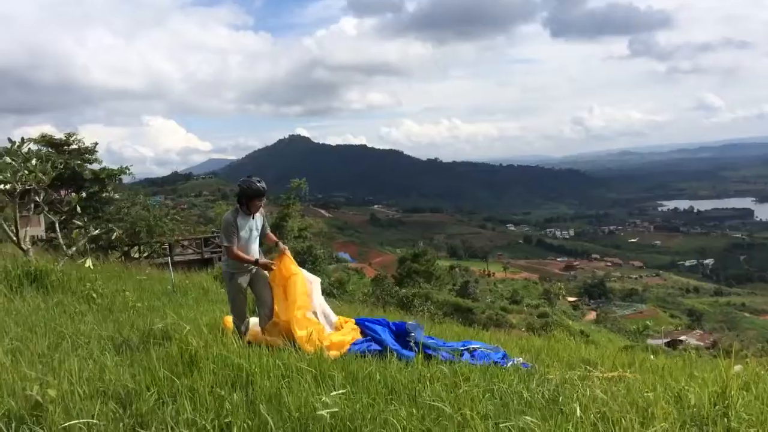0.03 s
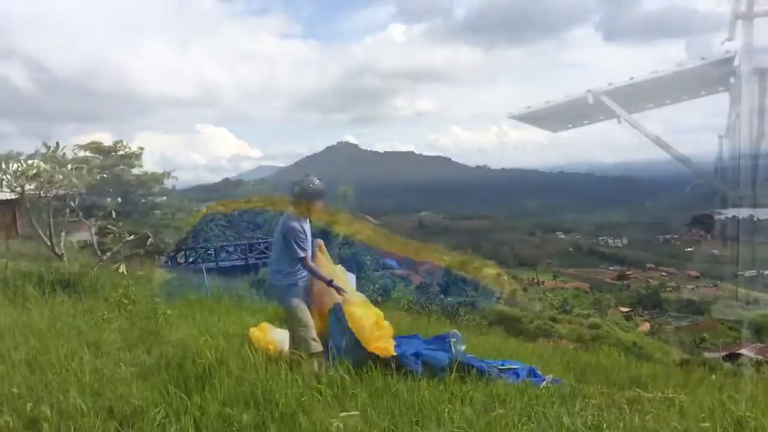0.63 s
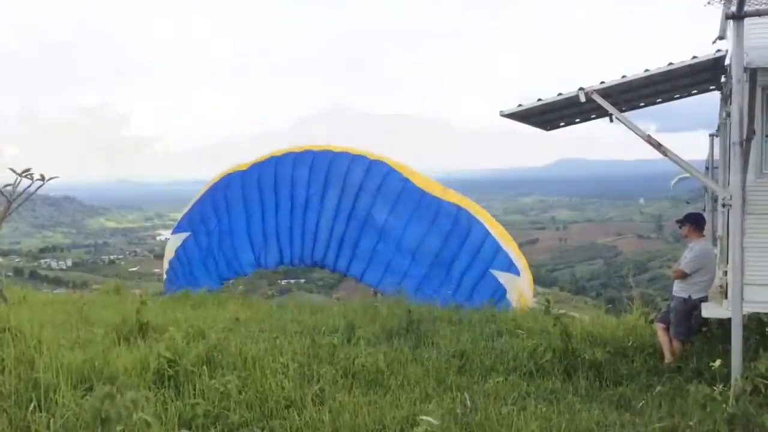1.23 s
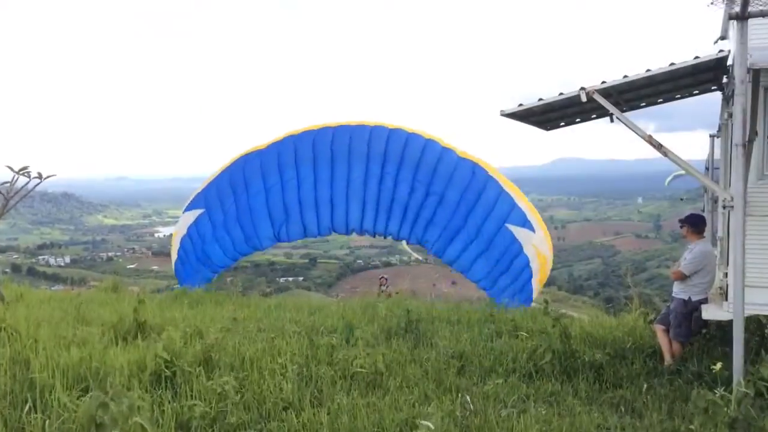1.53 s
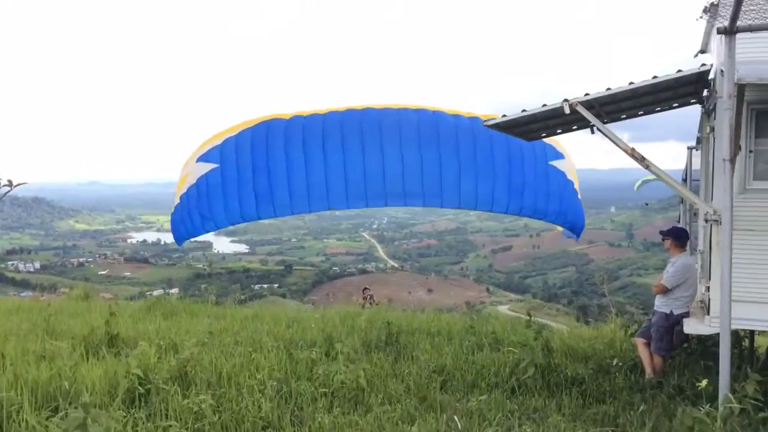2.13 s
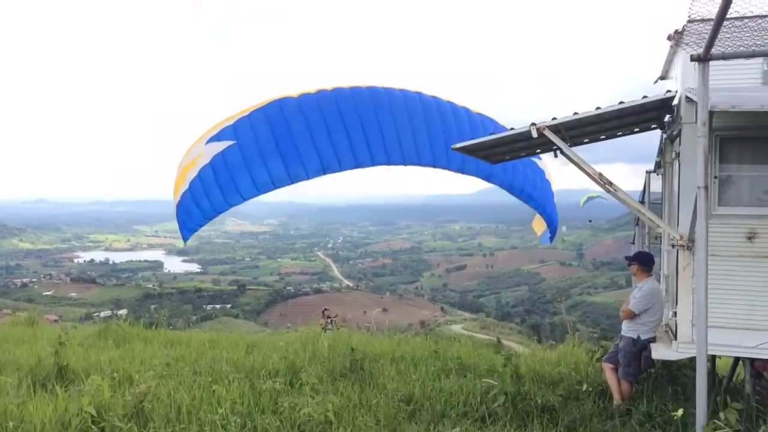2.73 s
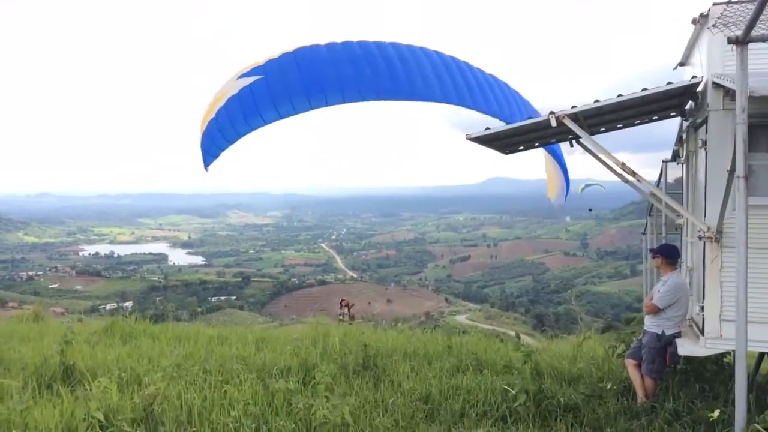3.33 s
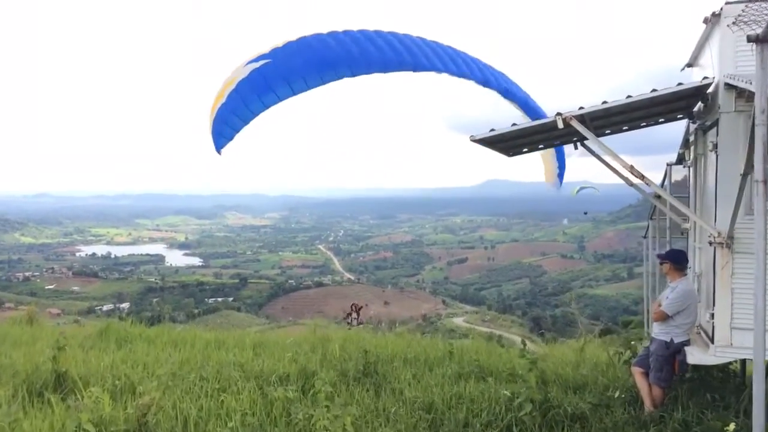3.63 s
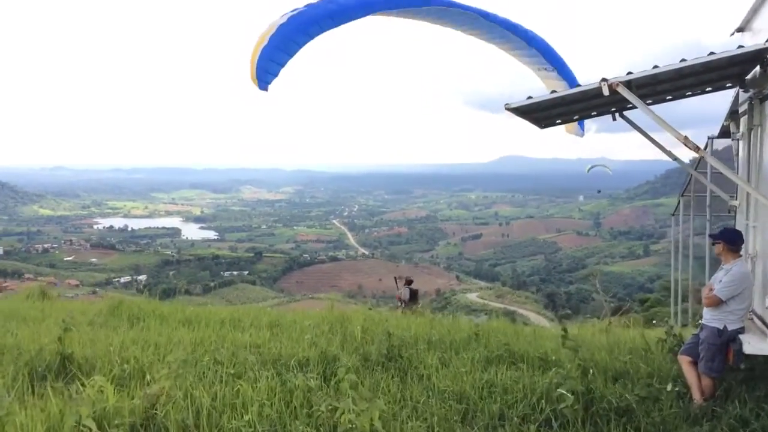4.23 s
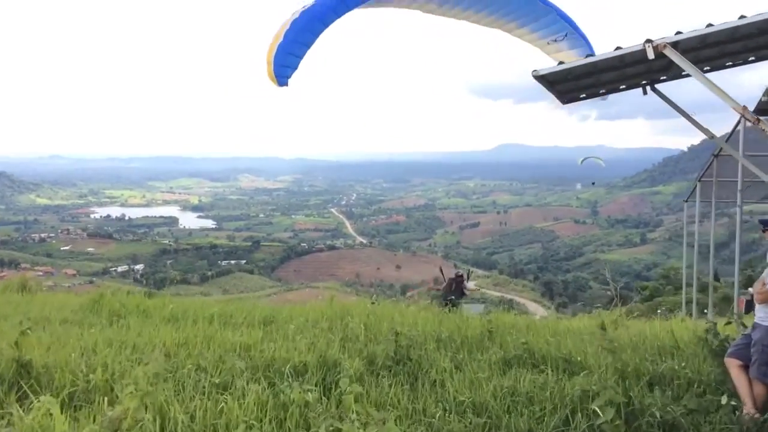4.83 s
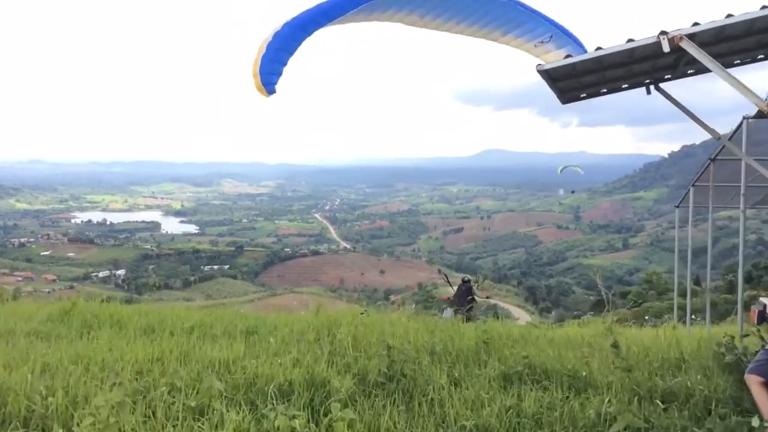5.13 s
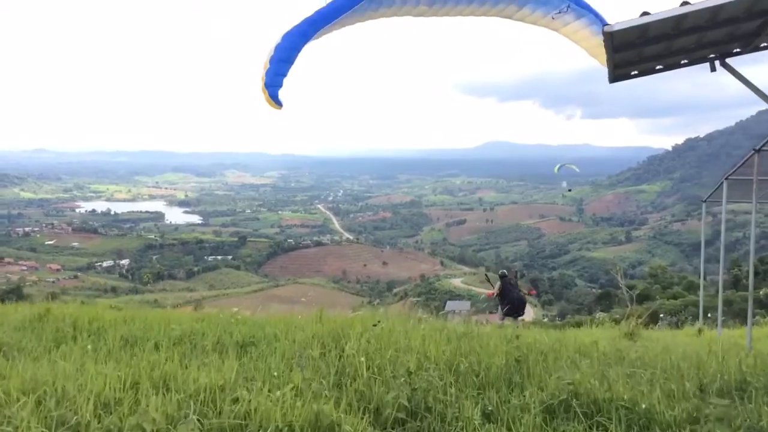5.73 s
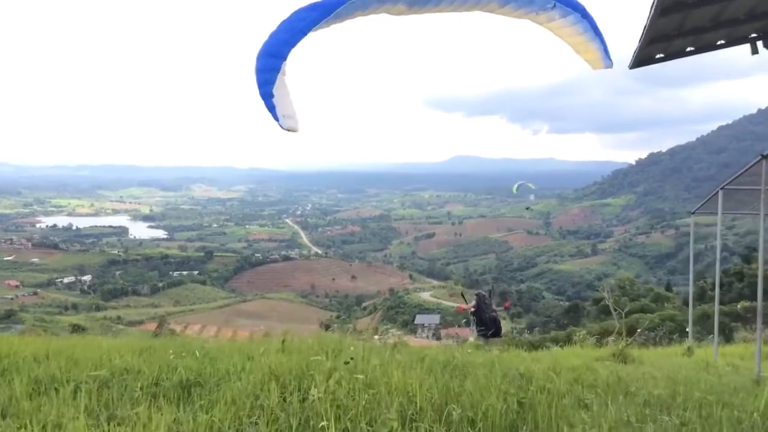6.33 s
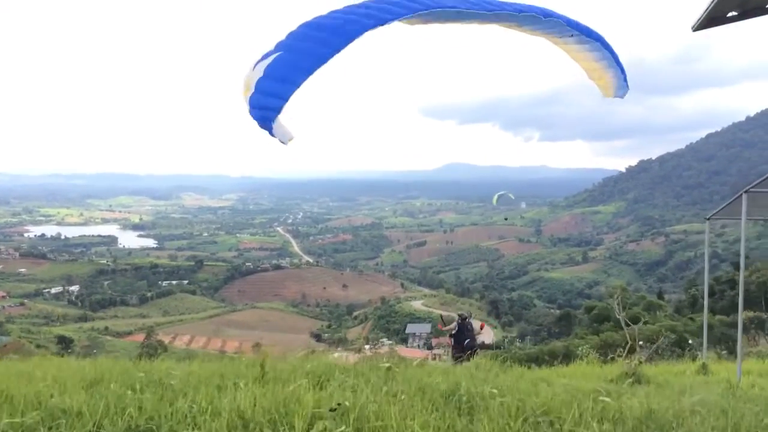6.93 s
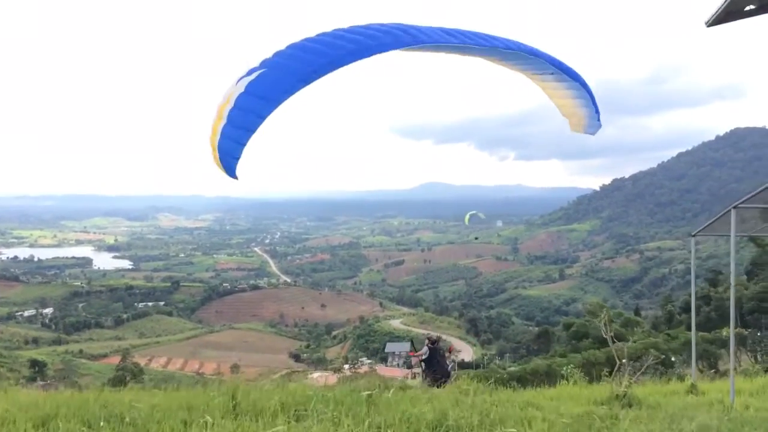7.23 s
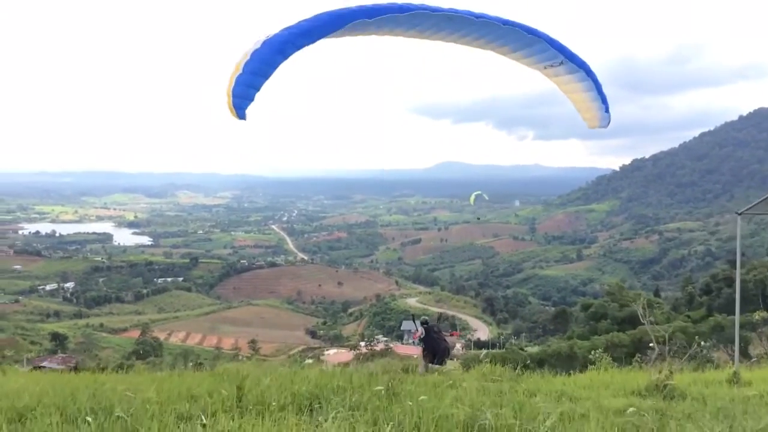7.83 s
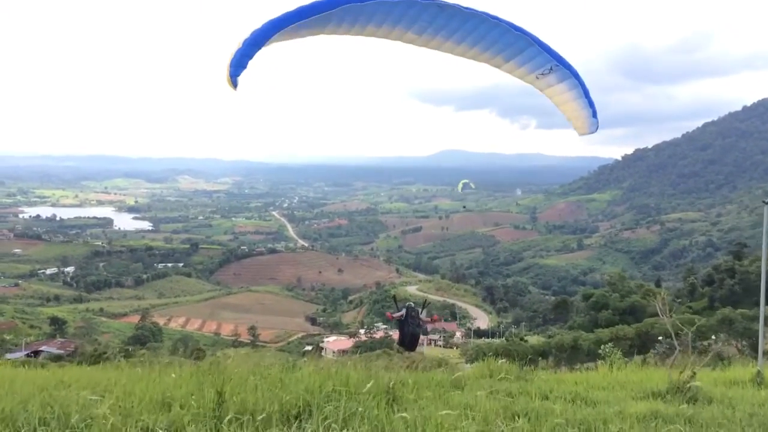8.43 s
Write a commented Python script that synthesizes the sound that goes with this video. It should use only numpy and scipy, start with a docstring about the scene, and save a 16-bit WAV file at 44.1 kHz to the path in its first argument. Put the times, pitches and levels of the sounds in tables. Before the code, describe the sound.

Wind on the microphone is the loudest sound, a low, uneven rumble with flutters and thumps, on an open hilltop without echo. For the first 2 seconds, a paraglider's thin cloth billows, crinkles and flaps softly underneath; its rustle fades out by about 4.5 seconds. From 2 to 3.8 seconds the buffeting grows dense, with the hardest thump near 2.5 seconds and a brief low flutter near 3. Around 4 to 5 seconds the wind on the microphone drops away, leaving grass hissing in waves, a soft roar of air over the slope and a few faint flaps. The rumble returns just after 5 seconds and builds to a strong, thumping gust around 6.6, joined by a faint hollow rush. A short rasp tears across the microphone at 7.2 seconds. Buffeting and grass hiss continue until the end, at about 8.5 seconds.

```python
"""A grassy hilltop in gusty wind, where a paraglider is being launched.
Air roars over the slope, and grass hisses in waves as its blades brush together.
The wing's cloth rushes and flaps as it fills, and its rush fades as it flies off.
Loudest is the wind on the microphone: swirls of air (eddies) rumble, flutter and thump,
and one gust rasps straight across the microphone's opening."""
import sys
import numpy as np
from scipy import signal
from scipy.fft import rfft, irfft
from scipy.io import wavfile
from scipy.ndimage import uniform_filter1d

SR = 44100
rng = np.random.default_rng(int(sys.argv[2]) if len(sys.argv) > 2 else 0)


def dump_mix(stems):
    """Bounce the given channels to the path in sys.argv[1] as a 16-bit WAV at rate SR."""
    frames = np.atleast_2d(stems).T  # one column per channel
    limited = np.clip(frames, -1, 1)  # hard clip at full scale
    pcm = np.round(limited * 32767).astype(np.int16)
    wavfile.write(sys.argv[1], SR, pcm)


N = 373968
TIME, HZ = np.arange(N) / SR, np.fft.rfftfreq(N, 1 / SR)

# waves of wind that sweep through the grass: peak_s, level_db, half_length_s
GRASS_WAVES = [(0, -46, 0.12), (.32, -49.5, 0.11), (.8, -49.5, 0.16), (1.38, -58, 0.13),
               (2.85, -59.5, 0.046), (3.08, -62.5, 0.054), (3.23, -53, 0.057), (3.57, -60.5, 0.047),
               (3.9, -50, 0.064), (4.03, -51.5, 0.069), (4.17, -50, 0.024), (4.31, -56.5, 0.05),
               (4.56, -50, 0.072), (4.76, -52, 0.063), (5.12, -47.5, 0.061), (5.38, -53, .028),
               (5.56, -51, 0.069), (5.75, -55.5, 0.058), (6.06, -45.5, 0.046), (6.23, -52, 0.073),
               (6.33, -50, 0.02), (6.44, -45.5, 0.056), (6.59, -47, 0.045), (6.85, -47.5, 0.091),
               (7.02, -49.5, 0.041), (7.27, -49, 0.11), (7.45, -49.5, 0.033), (7.61, -46, 0.031),
               (7.79, -46.5, 0.071), (8.125, -46.5, 0.026), (8.25, -44.5, 0.044), (8.42, -56, 0.038)]
# wind strength at the microphone, two long gusts around a lull: time_s, level_db
WIND_STRENGTH = [(0, -39), (.33, -38), (.55, -43.5), (.9, -38), (1.6, -40), (2.3, -38), (2.6, -37),
                 (3.3, -37.5), (3.9, -38.5), (4.36, -56.5), (4.7, -54), (5.07, -57.5), (5.15, -44),
                 (5.95, -44.5), (6.62, -31.5), (7.1, -38), (7.45, -34.5), (8.48, -34.5)]
# eddies that hit the microphone: time_s, level_db, low_hz (lower if big), top_hz (higher if sharp)
EDDIES = [(0.087, -33.5, 60, 463), (0.117, -22.5, 40, 163), (0.313, -26.5, 56.5, 460),
          (0.351, -25, 42, 244), (0.545, -31, 68.4, 466), (1.245, -28.5, 40, 214), (1.983, -30.5, 40, 250),
          (2.158, -20.5, 40, 204), (2.221, -17, 85, 278), (2.233, -26, 40, 580), (2.396, -25.5, 56, 147),
          (2.474, -26.5, 60, 120), (2.548, -11, 38, 405), (2.563, -17, 55, 650), (2.649, -29.5, 150, 330),
          (2.709, -24, 198, 250), (2.778, -29, 105, 207), (2.806, -21.5, 111, 554), (2.885, -47, 40, 190),
          (2.924, -21, 74, 786), (2.942, -24, 70, 387), (2.961, -20, 40, 350), (2.977, -24.5, 39.7, 1010),
          (2.996, -27, 40.3, 670), (3.009, -26, 40, 600), (3.048, -29.5, 91, 615), (3.125, -35, 91, 370),
          (3.171, -38, 45, 475), (3.235, -21.5, 40, 420), (3.276, -24, 45, 520), (3.289, -22.5, 139, 555),
          (3.355, -35.5, 40, 480), (3.574, -31, 74, 450), (3.644, -27.5, 42, 610), (3.719, -24.5, 100, 384),
          (3.756, -29, 140, 200), (3.883, -32, 74.4, 430), (5.134, -39.5, 40, 120), (5.281, -31.5, 69, 111),
          (5.373, -37.5, 40, 111), (5.526, -34.5, 40, 116), (5.649, -38.5, 79, 112),
          (5.847, -33.5, 60, 148), (6.071, -26.5, 40, 153), (6.16, -25, 40, 173), (6.419, -30.5, 60, 563),
          (6.523, -23.5, 56, 390), (6.547, -23, 42, 420), (6.602, -15.5, 230, 494),
          (6.641, -18.5, 130, 547), (6.653, -22, 110, 920), (6.733, -21, 39.7, 252), (6.83, -26.5, 40, 147),
          (7.031, -28.5, 69, 130), (7.319, -24, 40, 138), (7.369, -29.5, 40, 233), (7.439, -22.5, 42, 129),
          (7.657, -22, 98, 396), (7.693, -23.5, 210, 266), (7.917, -32.5, 56, 385), (8.272, -23, 85.5, 380),
          (8.339, -31, 130, 307), (8.365, -25, 170, 300)]


def gain_of(db):
    """Turns decibels into a factor to multiply a sound by."""
    return 10 ** (np.asarray(db) / 20)


def unit_level(x):
    """Scales a sound to an average (rms) level of 1."""
    return x / np.sqrt(np.mean(x ** 2) + 1e-20)


def follow(curve):
    """Gain at every sample, from rows of time_s, level_db."""
    return gain_of(np.interp(TIME, *np.transpose(curve)))


def swells(rows, fall_stretch=1.26, roundness=1.59):
    """Gain that rises to each peak and falls more slowly, from rows of peak_s, level_db, half_length_s."""
    t, power = TIME[::64], 0
    for peak_s, db, half_length_s in rows:
        away = abs(t - peak_s) / (half_length_s * np.where(t < peak_s, 1, fall_stretch))
        power = power + gain_of(db) ** 2 * np.exp(-away ** roundness)
    return np.interp(TIME, t, np.sqrt(power))


def tone_gains(tone):
    """Gain at every frequency, from rows of pitch_hz, level_db."""
    hz, db = np.transpose(tone)
    return gain_of(np.interp(np.log(HZ + 1), np.log(hz), db))


def coloured(x, tone):
    """Filters a sound by rows of pitch_hz, level_db and scales it to level 1."""
    return unit_level(irfft(rfft(x) * tone_gains(tone), N))


def wander(rate_hz):
    """A smooth random wobble, mostly slower than the given rate."""
    return unit_level(irfft(rfft(rng.standard_normal(N)) / (1 + (HZ / rate_hz) ** 4), N))


def band_noise(size, centre_hz, width_octaves):
    """Noise that is strongest around one pitch."""
    hz = np.fft.rfftfreq(size, 1 / SR)
    band = 1 / (1 + (np.log2((hz + 1) / centre_hz) / width_octaves) ** 2)
    return unit_level(irfft(rfft(rng.standard_normal(size)) * band, size))


def patchy_noise(patch_db):
    """Hiss in which patches a few hundred Hz wide swell and fade."""
    slices = signal.stft(rng.standard_normal(N), nperseg=512, noverlap=384)[2]
    patches = uniform_filter1d(rng.standard_normal(slices.shape), size=7, axis=0)  # smooth over pitch
    patches = uniform_filter1d(patches, size=14, axis=1)  # and over time
    slices = slices * gain_of(patch_db * unit_level(patches))
    return unit_level(signal.istft(slices, nperseg=512, noverlap=384)[1][:N])


def ticks(per_s, spread_db):
    """Scattered clicks; a wider spread makes a few stand out."""
    sizes = gain_of(spread_db * np.minimum(rng.exponential(1, N), 4))
    clicks = sizes * rng.standard_normal(N).clip(-1, 1)
    return unit_level(clicks * (rng.random(N) < per_s / SR))


def slope_roar(level_db=4, swirl_db=2.8, wave_db=-16):
    """Air roars softly over the hillside and lifts a little with each wave in the grass."""
    # strength of the air flowing over the slope: time_s, level_db
    airflow = [(0, -62), (.3, -69), (.85, -68), (1.4, -57), (1.9, -57), (2.67, -63), (3.75, -67.5),
               (4.04, -57.5), (4.4, -65), (4.7, -60), (5.35, -62), (5.67, -56.5), (5.95, -61.5),
               (6.2, -59.5), (7.05, -53), (7.4, -57.5), (8.48, -61.5)]
    # tone of the roar: pitch_hz, level_db
    roar_tone = [(60, -5), (250, 5.5), (480, 6), (750, 2.5), (1000, 1.5), (1400, -2.5), (2100, 0.5),
                 (2700, -7.5), (3600, -4.5), (8000, -28), (15000, -41)]
    roar = coloured(patchy_noise(patch_db=1.3), roar_tone)
    strength = np.hypot(follow(airflow), gain_of(wave_db) * swells(GRASS_WAVES))
    return gain_of(level_db) * strength * roar * gain_of(swirl_db * wander(rate_hz=53))


def hollow_rush(swirl_db=2.5):
    """A breathy, hollow note in the wind that grows with the second long gust."""
    # strength of the rush: time_s, level_db
    strength = [(5.9, -68), (6.3, -55), (7.1, -56), (7.5, -55.5), (8.48, -58)]
    rush = band_noise(N, centre_hz=1330, width_octaves=0.33)
    return follow(strength) * rush * gain_of(swirl_db * wander(rate_hz=20))


def grass_hiss(level_db=3, flutter_db=0.98, tick_db=-13):
    """Countless blades brush each other as waves of wind pass; the nearest tick one by one."""
    # stirring of the grass between waves: time_s, level_db
    stir = [(0, -61), (1.8, -62.5), (2.6, -67.5), (3.7, -66.5), (4.3, -61.5), (5.9, -58.5), (6.6, -56.5),
            (8.48, -56.5)]
    # tone of the brushing blades: pitch_hz, level_db
    blade_tone = [(300, -20), (1000, 2), (2200, -1), (4000, 0.5), (6000, -0.5), (8300, 1.8), (11500, 0),
                  (15000, -0.5)]
    brush = patchy_noise(patch_db=1.4) + gain_of(tick_db) * ticks(per_s=350, spread_db=7.0)
    bending = np.hypot(follow(stir), swells(GRASS_WAVES))
    flutter = gain_of(flutter_db * wander(rate_hz=75))
    return gain_of(level_db) * bending * coloured(brush, blade_tone) * flutter


def wing_rustle(level_db=2, flutter_db=0.77, crinkle_db=-12):
    """Thin cloth billows, flutters and crinkles, then is carried out of hearing."""
    # steady rush of the cloth, fading as it flies off: time_s, level_db
    rush = [(0, -57), (1.95, -59), (3.1, -67.5), (3.8, -63), (4.6, -100)]
    # billows as the wing fills: peak_s, level_db, half_length_s
    billows = [(0, -51.5, 0.13), (.79, -49.5, 0.093), (1.07, -51.5, 0.081), (1.32, -48, .1),
               (1.51, -53, 0.064), (1.71, -49.5, 0.055), (1.825, -48.5, 0.027), (2.1, -55, 0.072)]
    # tone of the cloth: pitch_hz, level_db
    cloth_tone = [(200, -21), (600, 0.5), (1500, 0), (2400, -2), (3400, -0.5), (5000, -4), (7000, -6),
                  (10000, -17.5), (15000, -28)]
    rustle = patchy_noise(patch_db=2.2) + gain_of(crinkle_db) * ticks(per_s=580, spread_db=5.0)
    motion = np.hypot(follow(rush), swells(billows))
    flutter = gain_of(flutter_db * wander(rate_hz=22))
    return gain_of(level_db) * motion * coloured(rustle, cloth_tone) * flutter


def cloth_flaps(level_db=-1, rise_share=0.91, size=4096):
    """Each fold of cloth turns over with a puff of noise that rises faster than it dies."""
    # soft flaps of cloth: peak_s, level_db, pitch_hz, half_length_s
    flaps = [(0.243, -47, 1590, .01), (1.488, -45, 1000, .014), (1.55, -43, 1500, 0.0066),
             (1.702, -47, 1400, .016), (1.822, -46.5, 1400, .012), (2.054, -43.5, 1700, .007),
             (4.06, -50, 770, 0.019), (4.679, -51, 1300, .013), (4.785, -53, 1300, 0.0099),
             (4.938, -52.5, 430, 0.0065), (5.21, -52, 1200, .018), (5.52, -49.5, 2200, .013),
             (5.831, -47.5, 1090, 0.0065), (6.091, -45, 1170, 0.016), (6.212, -45, 1180, 0.012),
             (6.422, -45, 1200, .02), (7.616, -46.5, 1400, 0.016), (8.243, -49, 1390, 0.012)]
    out, t = np.zeros(N), (np.arange(size) - size // 2) / SR
    for peak_s, db, pitch_hz, half_length_s in flaps:
        puff = band_noise(size, pitch_hz, width_octaves=0.65)
        away = t / (half_length_s * np.where(t < 0, rise_share, 1))
        add(out, peak_s + t[0], gain_of(db + level_db) * puff * np.exp(-.5 * away ** 2))
    return out


def add(mix, start_s, sound):
    """Mixes a sound in at the given time."""
    start = round(start_s * SR)
    part = mix[max(start, 0):start + len(sound)]
    part += sound[max(-start, 0):][:len(part)]


def gust_rasp(hiss_db=-41, hiss_growth=0.28):
    """Air tears across the microphone's opening in tiny pops that ring its hollow, with a gentler hiss."""
    # strength of the jet of air: time_s, level_db
    jet = [(7.09, -57), (7.125, -39), (7.165, -41.5), (7.19, -39), (7.218, -33), (7.229, -24.5),
           (7.243, -37), (7.27, -44)]
    # tone of the hollow opening: pitch_hz, level_db
    rasp_tone = [(100, -30), (250, 3), (350, 7.5), (470, 1), (650, -2.5), (800, 1), (1050, -4.5),
                 (1650, -2.5), (2400, -13), (4500, -43), (15000, -52)]
    hiss_tone = [(800, -19), (2500, 0.5), (5000, -0.5), (8000, -6.5), (15000, -16)]
    force = follow(jet) * ((TIME > jet[0][0]) & (TIME < jet[-1][0]))
    tearing = rng.standard_normal(N) + ticks(per_s=430, spread_db=0)
    hiss = coloured(rng.standard_normal(N), hiss_tone)
    hiss_strength = gain_of(hiss_db) * (force / force.max()) ** hiss_growth
    return force * coloured(tearing, rasp_tone) + hiss_strength * hiss


def whirl_train(level_db=-1, wobble=0.058):
    """In a strong gust, whirls peel off the microphone's case one after another: a brief low flutter."""
    # the regular train of whirls: time_s, level_db, whirls_per_s
    train = [(2.895, -44, 126), (2.912, -19, 146), (2.935, -15.5, 126), (2.96, -18, 100), (2.985, -35, 105),
             (3.02, -45, 140)]
    time_s, db, whirls_per_s = np.transpose(train)
    pitch_hz = np.interp(TIME, time_s, whirls_per_s) * (1 + wobble * wander(rate_hz=72))
    turns = np.cumsum(pitch_hz) / SR
    blowing = (TIME > time_s[0]) & (TIME < time_s[-1])
    strength = gain_of(level_db + np.interp(TIME, time_s, db)) * blowing
    return strength * np.sqrt(2) * np.sin(2 * np.pi * (turns + rng.random()))


def small_whirls(level_db=-53, breeze_db=-38.5, growth=2.3, flutter_db=6.0):
    """Small whirls flutter on the microphone in strong wind, in flurries and behind each eddy."""
    # flurries that come without a large eddy: peak_s, level_db, half_length_s
    flurries = [(2.674, -35, 0.032), (3.046, -38, 0.048), (3.808, -39, 0.077), (6.114, -36.5, 0.046),
                (6.333, -35, 0.021)]
    whirl_tone = [(50, -16), (125, 6), (200, 4), (330, -3.0), (500, -14.5), (750, -24.5),
                  (1100, -40), (2000, -82)]
    lag_s, trail_db, half_length_s, sharp_hz = 0.0055, -17, 0.03, 300
    whirls = coloured(rng.standard_normal(N), whirl_tone)
    flutter = gain_of(flutter_db * wander(rate_hz=46))
    # the whirls grow faster than the wind itself, counted from a moderate breeze
    steady = gain_of(level_db) * (follow(WIND_STRENGTH) / gain_of(breeze_db)) ** growth
    trails = []
    for time_s, db, _, top_hz in EDDIES:
        dullness_db = 20 * np.log10(min(top_hz / sharp_hz, 1))  # dull eddies leave weaker trails
        trails.append((time_s + lag_s, db + trail_db + dullness_db, half_length_s))
    return np.hypot(steady, swells(trails + flurries)) * unit_level(whirls * flutter)


def wind_rumble(level_db=1, puff_db=8.5):
    """Large eddies roll over the microphone in puffs with short gaps."""
    # tone of the rumble: pitch_hz, level_db
    rumble_tone = [(15, -49), (25, -2.5), (40, -3), (62, 1), (85, -1), (115, -1), (165, -13), (250, -19),
                   (400, -40), (700, -54), (1500, -88)]
    puffs = gain_of(puff_db * np.tanh(wander(rate_hz=14) / 1.4))
    roll = coloured(rng.standard_normal(N), rumble_tone)
    roll = roll / np.sqrt(uniform_filter1d(roll ** 2, size=6000) + 1e-6)  # even out its own slow swells
    return gain_of(level_db) * follow(WIND_STRENGTH) * unit_level(roll * puffs)


def eddy_thumps(wake_gain=0.69, wake_s=0.009, wake_top_share=0.83, bass_cut_hz=45, size=8192):
    """Each eddy hits the microphone as one swing of pressure inside a short, ragged, duller wake."""
    out, hz, t = np.zeros(N), np.fft.rfftfreq(size, 1 / SR), (np.arange(size) - size // 2) / SR
    bass_cut = 1 / np.sqrt(1 + (bass_cut_hz / (hz + 1)) ** 6)  # the microphone loses the deepest bass
    click = rfft(1. * (t == 0))
    scale = np.sqrt(0.02 * SR / size)  # levels count as if the thump's energy were packed into 20 ms
    for time_s, db, low_hz, top_hz in EDDIES:
        # big whirls break into ever smaller, weaker ones, ending steeply at top_hz
        tone = bass_cut * (hz / low_hz) ** 2 / (1 + (hz / low_hz) ** 2) ** 1.562
        swing_tone = tone / np.sqrt(1 + (hz / top_hz) ** 10)
        wake_tone = tone / np.sqrt(1 + (hz / (top_hz * wake_top_share)) ** 10)
        swing = irfft(swing_tone * click * np.exp(2j * np.pi * rng.random()))
        burst = rng.standard_normal(size) * np.exp(-.5 * (t / wake_s) ** 2)
        wake = irfft(wake_tone * rfft(burst))
        thump = unit_level(unit_level(swing) + wake_gain * unit_level(wake))
        add(out, time_s + t[0], gain_of(db) * thump * scale)
    return out


def scene():
    """Wind, grass and wing in open air without echoes, heard at one microphone."""
    on_microphone = wind_rumble() + small_whirls() + eddy_thumps() + whirl_train() + gust_rasp()
    return (on_microphone + grass_hiss() + wing_rustle() + cloth_flaps() + slope_roar() + hollow_rush())[None]


def record(dry, top_hz=15450):
    """The microphone colours the sound, and the highest treble is cut off."""
    # tone of the microphone in its case: pitch_hz, level_db
    microphone_tone = [(20, -14), (60, 3), (120, 1), (190, 0), (270, -3.5), (360, -2), (470, 1), (620, 0),
                       (800, 0.5), (16000, -1)]
    heard = irfft(rfft(dry) * tone_gains(microphone_tone), N)
    treble_cut = signal.firwin(511, top_hz, window=("kaiser", 9), fs=SR)
    return signal.oaconvolve(heard, treble_cut[None], "same")


dry = scene()
out = record(dry)
dump_mix(out)
```